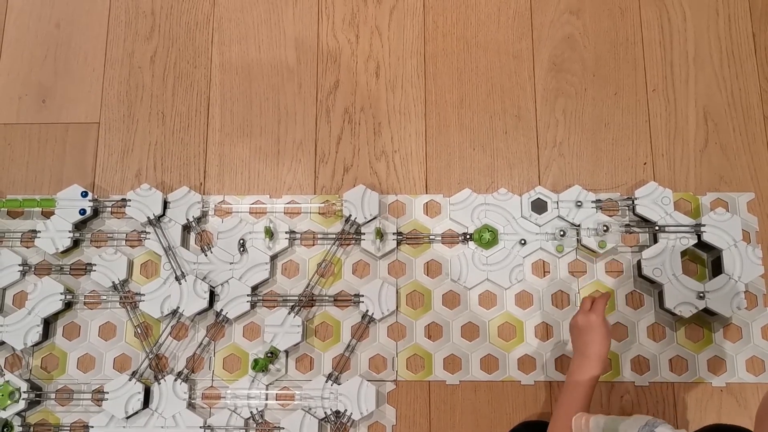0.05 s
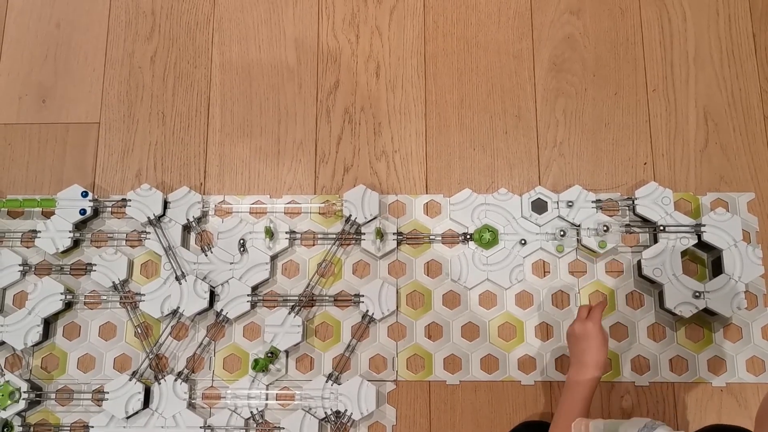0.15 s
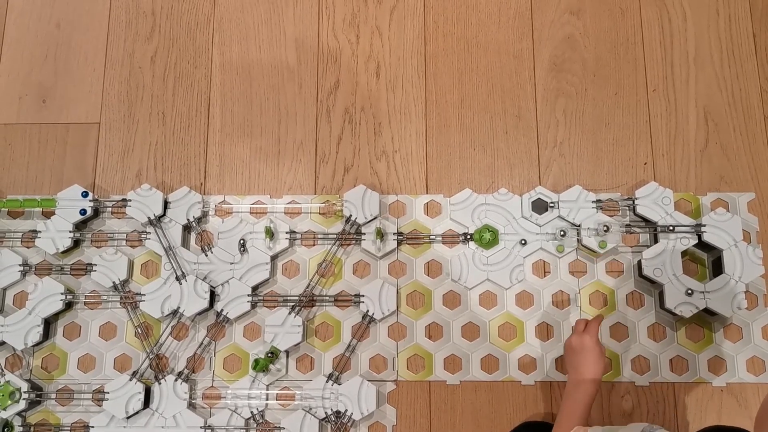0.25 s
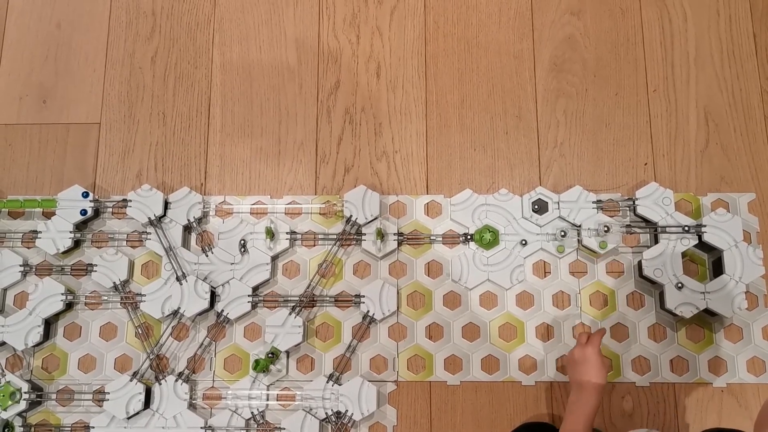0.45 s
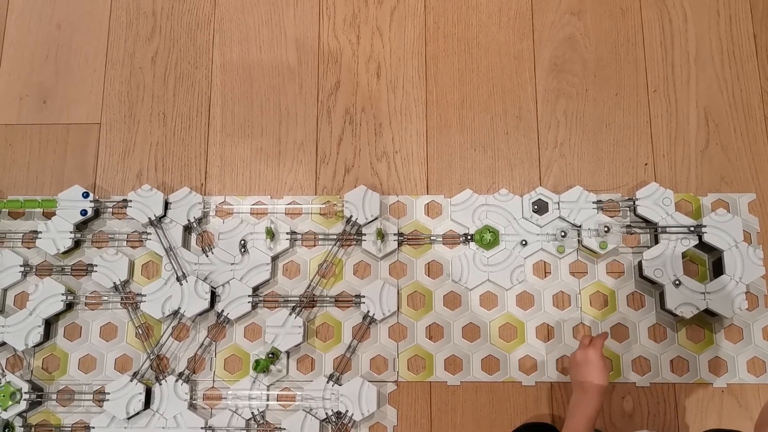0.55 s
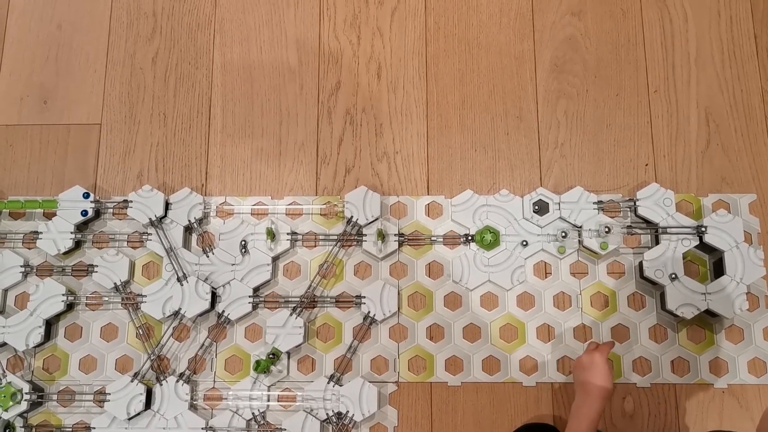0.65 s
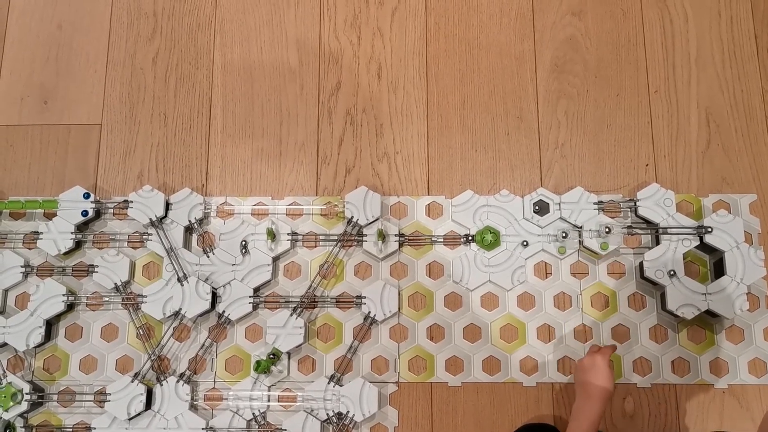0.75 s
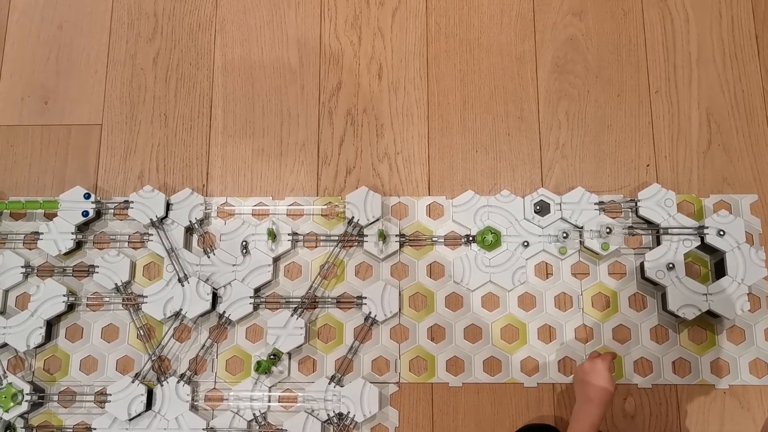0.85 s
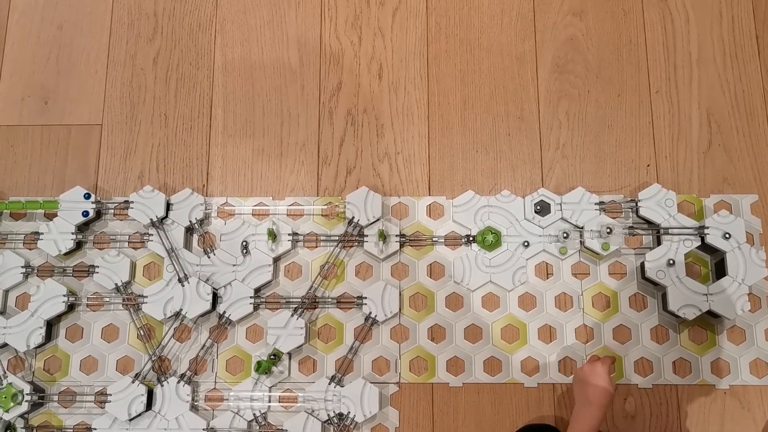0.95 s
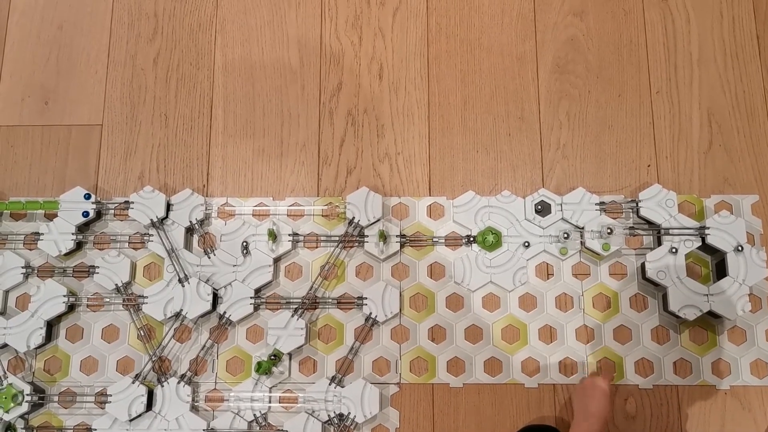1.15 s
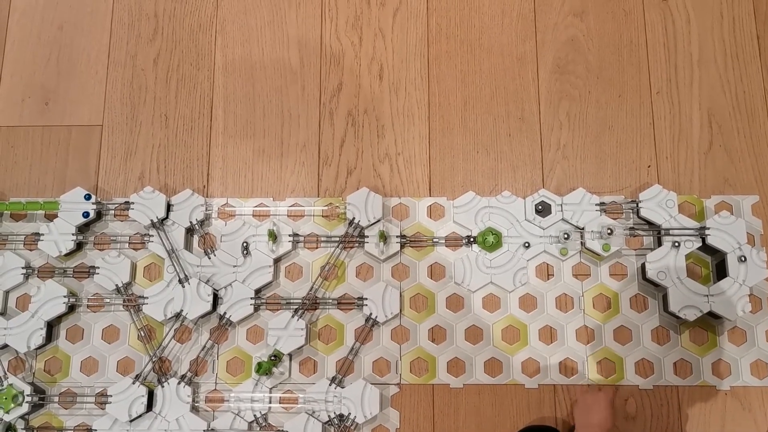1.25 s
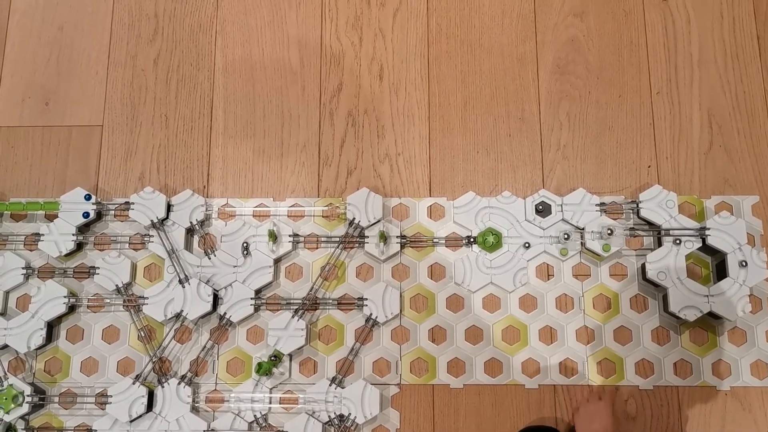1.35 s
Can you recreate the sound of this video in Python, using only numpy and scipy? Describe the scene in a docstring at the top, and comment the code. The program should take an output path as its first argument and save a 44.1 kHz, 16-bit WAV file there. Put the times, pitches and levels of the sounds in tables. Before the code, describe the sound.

Marbles knock and click through a plastic marble run, with a light rolling rattle between the hits. One sharper clack stands out, then loose pieces tap softly. The bare room adds short echoes.

```python
"""In a bare room with a wooden floor, marbles roll down a plastic marble run. Each knock of a marble rings a
hollow tile, thuds the base board and clicks where it touches. Rolling over seams makes a stream of tiny bumps,
loose pieces tap, and marbles tick together. The room answers: nearby walls throw back quick copies of some
knocks, echoes run between floor and ceiling, and a long tail fades. A soft hush and a faint rumble lie under it
all."""
import sys
import numpy as np
from scipy import signal
from scipy.fft import rfft, irfft, next_fast_len
from scipy.io import wavfile

SR = 44100
rng = np.random.default_rng(int(sys.argv[2]) if len(sys.argv) > 2 else 0)


def put_to_file(sound):
    """Save the sound as 16-bit audio at rate SR, in the file named by the first command-line argument."""
    columns = np.atleast_2d(sound).T  # one column per channel
    safe = np.clip(columns, -1, 1)
    whole_steps = np.round(safe * 32767)
    wavfile.write(sys.argv[1], SR, whole_steps.astype(np.int16))


N = 61739  # samples, 1.4 s
T = np.arange(int(.12 * SR)) / SR  # the clock of one hit, in seconds

# How long the room's tail lasts (t60 is the time to fade by 60 dB): f/Hz, t60/s
ROOM_DECAY = [(150, 3.6), (450, 1.85), (1100, 1.05), (2300, 1.065), (4000, 0.79), (8000, 0.46)]
# The tone colour of that tail, or how strong its lows and highs are: f/Hz, level/dB
ROOM_COLOUR = [(150, 0.5), (450, -5), (1100, 4), (2300, -4.5), (4000, -1), (8000, -9)]
# Tone colour of the hush: f/Hz, level/dB
HUSH_COLOUR = [(20, 2), (60, -11), (160, 2.5), (350, -11.5), (650, -9), (1300, -20), (3000, -41.5),
               (8500, -38.5)]
# Tone colour of the rumble: f/Hz, level/dB
RUMBLE_COLOUR = [(20, -3), (32, 0), (55, -22), (85, -8.5), (130, -25), (300, -36), (1000, -87)]
# How the rumble sinks and swells: t/s, level/dB
RUMBLE_LOUDNESS = [(0, -57), (.4, -62), (0.801, -68.5), (.97, -53.5), (1.171, -59.5), (1.3, -64.5)]
# Tone colour of the track under rolling marbles: f/Hz, level/dB
ROLL_COLOUR = [(100, -15.5), (400, -5), (700, -4), (1100, -6.5), (1500, -4), (2400, 5), (3100, -16),
               (6000, -19), (9000, -76.5)]
# How loud the rolling is over time: t/s, level/dB
ROLL_LOUDNESS = [(0, -54.5), (.09, -58), (.15, -58.5), (.32, -48), (0.452, -57.5), (0.679, -42.5),
                 (0.898, -50), (1.048, -70.5), (1.295, -66), (1.318, -48.5), (1.4, -47)]
# Marbles hitting tiles, plus quick copies of two knocks thrown back by nearby walls (the rows at 0.2238 s and
# 0.4709 s): t/s, ring/dB, thud/dB, click/dB, pitch factor, ring length factor, # left over right/dB, left
# delay/ms, room tail/dB, ceiling echo boost/dB
TILE_KNOCKS = [(0.0386, -44, -69, -46, 1.13, 0.97, -2, 0.078, 6, -4.5),
               (0.094, -39.5, -47, -47.5, 0.99, 0.81, -4, 0.084, -1, 2.5),
               (0.2212, -25.5, -43.5, -35, 0.9245, 0.52, 0, 0.24, 0.5, 2.5),
               (.2238, -29, -49.5, -37, .97, 0.69, -6, 0.17, -1.5, -2.5),
               (0.4666, -18, -31.5, -33.5, 1.011, 1, -2, 0.033, 3, 1),
               (0.4709, -36.5, -36, -41, 0.93, 0.73, 0, 0.12, 8, 9),
               (0.62, -30, -34, -40.5, 1.0, 0.78, -2, 0.095, 1, 2.5),
               (0.8113, -38, -40, -51, 0.9, 0.69, -3, 0.18, 4, 1.5),
               (0.8151, -37.5, -42, -48, .99, 1, 1.5, .05, 4.5, -2.5)]
# The tones a hollow tile rings with: f/Hz, level/dB, t60/s
TILE_TONES = [(1002, -11, 0.0086), (1195, -26.5, 0.045), (2018, -1.5, 0.016), (2342, 4, 0.013),
              (2480, -5, 0.021), (3050, -19, .014), (3514, -22, 0.02), (3570, -42.5, 0.035),
              (4070, -25, 0.005), (5490, -31, 0.021), (7370, -24.5, 0.015), (8360, -22.5, 0.0048)]
# The tones of the base board on the floor: f/Hz, level/dB, t60/s
BOARD_TONES = [(452, -10.5, 0.039), (512, -4.5, 0.033), (738.5, 11.5, 0.013), (938, 4.5, 0.019),
               (1115, 10.5, 0.015), (1636, 3.5, 0.025)]
# Tone colour of the dull noise in a knock or tap: f/Hz, level/dB
THUD_COLOUR = [(100, -25.5), (250, -12), (420, -2), (700, 1.5), (1200, -9), (1700, 1), (3000, -7.5),
               (6000, -41.5)]
# Tone colour of the click at the point of contact: f/Hz, level/dB
CLICK_COLOUR = [(500, -19.5), (1500, 0.5), (2800, 3), (3900, 0), (5000, -9.5), (6200, -3.5), (7500, -29),
                (9000, -23.5)]
# Light taps on loose pieces: t/s, f/Hz, level/dB, t60/s, click/dB, room tail/dB
LOOSE_TAPS = [(0.04, 1898, -45.5, 0.048, -64, 9), (.0470, 1434, -59.5, 0.14, -63, 22),
              (0.0948, 970, -47.5, .03, -48.5, 5), (.1100, 1048, -41, 0.02, -65, 3),
              (0.1993, 1227, -45.5, .04, -74, 1), (.2230, 829, -46.5, 0.067, -53.5, 12.5),
              (.8130, 1102, -42.5, 0.011, -58.5, 4.5), (1.304, 1590, -45.5, 0.014, -50.5, 7.5),
              (1.306, 210, -55.5, 0.016, -60, 3), (1.315, 1444, -44, 0.041, -49.5, 4.5),
              (1.3230, 674, -49.5, 0.041, -51, 13), (1.3640, 672, -47.5, 0.004, -60, -3),
              (1.3695, 1400, -46, 0.0049, -51, -8), (1.388, 1084, -48, 0.014, -68, 32)]
# Marbles hitting each other: t/s, level/dB
MARBLE_TICKS = [(0.5226, -39), (1.3232, -59)]
# Tone colour of a tick: f/Hz, level/dB
TICK_COLOUR = [(1500, -25), (3500, -8), (5500, 0), (7700, -1), (9000, -20)]

THUD_T60, CLICK_T60, TICK_T60 = 0.051, 0.038, 0.01  # seconds
ATTACK_S, TILE_ATTACK_S = 0.0009, 0.0024  # a tile takes a moment longer to swing up
RATTLE_DB, SCRAPE_DB = -1, -10.5  # dull noise, next to the ring of the board and of a tap
SEAMS_PER_S, SEAM_SPREAD_DB = 900, 11
CEILING_S, ECHO_DB, ECHO_LOSS_DB = .0153, -11, 3.5  # time per bounce, first echo, loss per bounce
SCATTER_DB, SCATTER_T60 = -3, 0.0057  # the track scatters part of each echo
ROOM_BUILD_S, ROOM_LEAN_DB = 0.022, -2  # the room's answer is a little louder on the right
HUSH_DB, TOP_HZ = -66.5, 8900


def amp(db):
    """Turn decibels into a number to multiply by."""
    return 10 ** (np.asarray(db) / 20)


def standard_hit(x, hold_s=.005):
    """Give a hit the same energy as a sound of strength 1 held for hold_s."""
    energy = np.mean(np.sum(x ** 2, -1))
    return x / np.sqrt(energy / (hold_s * SR))


def at_frequency(points, hz):
    """Read between the rows of a frequency table, with the octaves evenly spaced."""
    f, values = np.transpose(points)
    return np.interp(np.log(hz + 1), np.log(f), values)


def loudness(points):
    """Turn a table of times and levels into a volume curve for the whole scene."""
    return amp(np.interp(np.arange(N) / SR, *np.transpose(points)))


def filtered(x, response):
    """Multiply each frequency in x by response(hz)."""
    n = x.shape[-1]
    padded = next_fast_len(n + 8192)
    hz = np.fft.rfftfreq(padded, 1 / SR)
    return irfft(rfft(x, padded) * response(hz), padded)[..., :n]


def coloured(x, colour):
    """Give x a tone colour and bring its average strength (rms) to 1."""
    shaped = filtered(x, lambda hz: amp(at_frequency(colour, hz)))
    return shaped / np.sqrt(np.mean(shaped ** 2) + 1e-20)


def noise_pair(size, alike):
    """White noise for left and right: unrelated when alike is 0, the same when it is 1."""
    shared, apart = rng.standard_normal((2, size))
    angle = np.arccos(np.clip(alike, -1, 1)) / 2
    middle, side = np.cos(angle) * shared, np.sin(angle) * apart
    return np.array([middle + side, middle - side])


def pan(db):
    """Volumes that make the left side db louder than the right."""
    return amp(np.array([[db], [-db]]) / 2)


def left_delayed(x, ms):
    """The sound reaches the left side ms later than the right."""
    return filtered(x, lambda hz: np.exp(-1j * np.pi * hz * ms / 1000 * np.array([[1], [-1]])))


def add(out, start_s, x):
    """Mix x into out, beginning at start_s."""
    part = out[:, max(round(start_s * SR), 0):][:, :x.shape[1]]
    part += x[:, :part.shape[1]]


def fade(t60, attack_s=ATTACK_S):
    """The shape of a hit: it rises fast, then dies away."""
    return amp(-60 * T / t60) * (1 - np.exp(-T / attack_s))


def burst(colour, t60):
    """A hit wakes many close, short-lived tones, which blur into a puff of noise."""
    return standard_hit(coloured(noise_pair(len(T), alike=0.2), colour) * fade(t60))


def ring(tones, attack_s=ATTACK_S):
    """A struck object rings with its own fading tones, a little out of step left and right."""
    phases = .3 * rng.standard_normal(len(tones))  # radians
    sound = np.zeros((2, len(T)))
    for (hz, db, t60), phase in zip(tones, phases):
        wave = np.sin(2 * np.pi * hz * T + np.array([[phase], [-phase]]))
        sound += amp(db) * fade(t60, attack_s) * wave
    return standard_hit(sound)


def room(tail_db, echo_db=0):
    """The room's answer to one click: four floor-to-ceiling echoes and a tail that builds behind them."""
    hz, t, bands = signal.stft(noise_pair(N, alike=0.083), SR, nperseg=256)
    decay = np.log(1000) / at_frequency(ROOM_DECAY, hz)[:, None]  # low notes last longest
    bands = bands * amp(at_frequency(ROOM_COLOUR, hz))[:, None] * np.exp(-decay * t)
    bands *= np.sqrt(2 * decay / SR)  # so a longer fade does not add energy
    tail = signal.istft(bands, SR, nperseg=256)[1][:, :N]
    build_up = 1 - np.exp(-(np.arange(N) / SR / ROOM_BUILD_S) ** 2)
    answer = amp(tail_db) * build_up * tail
    for bounce in range(4):
        scatter = noise_pair(len(T), alike=0.44) * fade(SCATTER_T60)
        echo = amp(SCATTER_DB) * scatter / np.linalg.norm(scatter[0])
        echo[:, 0] += 1  # the clean part of the echo
        add(answer, (bounce + 1) * CEILING_S, amp(ECHO_DB + echo_db - ECHO_LOSS_DB * bounce) * echo)
    return answer * pan(ROOM_LEAN_DB)


def in_room(x, tail_db, delay_ms=0, echo_db=0):
    """A sound together with the room's answer to it."""
    out = signal.fftconvolve(x, room(tail_db, echo_db), axes=1)[:, :N]
    add(out, 0, left_delayed(x, delay_ms))
    return out


def background():
    """The steady hush of the room and a faint rumble that sinks and swells."""
    hush = amp(HUSH_DB) * coloured(noise_pair(N, alike=1), HUSH_COLOUR)
    rumble = loudness(RUMBLE_LOUDNESS) * coloured(noise_pair(N, alike=0.29), RUMBLE_COLOUR)
    return hush + rumble


def rolling():
    """Marbles roll over seams: a stream of tiny bumps that shake the track and fill the room."""
    on_seam = rng.random(N) < SEAMS_PER_S / SR
    sizes = amp(SEAM_SPREAD_DB * rng.uniform(-1.2, 1, N))
    bumps = on_seam * sizes * np.sign(noise_pair(N, alike=0.11))
    # The echoes wrap around from end to start, so the room is already sounding when we begin.
    echoes = irfft(rfft(bumps) * rfft(room(tail_db=7)), N)
    return loudness(ROLL_LOUDNESS) * coloured(bumps + echoes, ROLL_COLOUR)


def knocks():
    """A marble hits a tile, or a near wall throws a knock back: the tile rings, the board thuds, the contact
    clicks."""
    out = np.zeros((2, N))
    for t, ring_db, thud_db, click_db, pitch, length, lean_db, delay_ms, tail_db, echo_db in TILE_KNOCKS:
        tile = ring([(hz * pitch, db, t60 * length) for hz, db, t60 in TILE_TONES], TILE_ATTACK_S)
        board = ring(BOARD_TONES)
        rattle = amp(RATTLE_DB) * burst(THUD_COLOUR, THUD_T60)  # loose pieces buzz with the board
        click = burst(CLICK_COLOUR, CLICK_T60)
        hit = amp(ring_db) * tile + amp(thud_db) * (board + rattle) + amp(click_db) * click
        add(out, t, in_room(hit * pan(lean_db), tail_db, delay_ms, echo_db))
    return out


def taps():
    """Loose track pieces are nudged: each gives its own short note, a dull scrape and a click."""
    out = np.zeros((2, N))
    for t, hz, db, t60, click_db, tail_db in LOOSE_TAPS:
        note = ring([(hz, 0, t60)])
        scrape = amp(SCRAPE_DB) * burst(THUD_COLOUR, THUD_T60)
        click = burst(CLICK_COLOUR, CLICK_T60)
        tap = amp(db) * (note + scrape) + amp(click_db) * click
        add(out, t, in_room(tap, tail_db))
    return out


def ticks():
    """Two marbles touch with a short, bright tick."""
    out = np.zeros((2, N))
    for t, db in MARBLE_TICKS:
        tick = amp(db) * burst(TICK_COLOUR, TICK_T60)
        add(out, t, in_room(tick, tail_db=5.5))
    return out


def scene():
    """The marble run in its room, with all the sounds added together."""
    return background() + rolling() + knocks() + taps() + ticks()


def record(dry):
    """Cut away the highest treble, steeply above TOP_HZ."""
    return filtered(dry, lambda hz: 1 / np.sqrt(1 + (hz / TOP_HZ) ** 80))


dry = scene()
out = record(dry)
put_to_file(out)
```